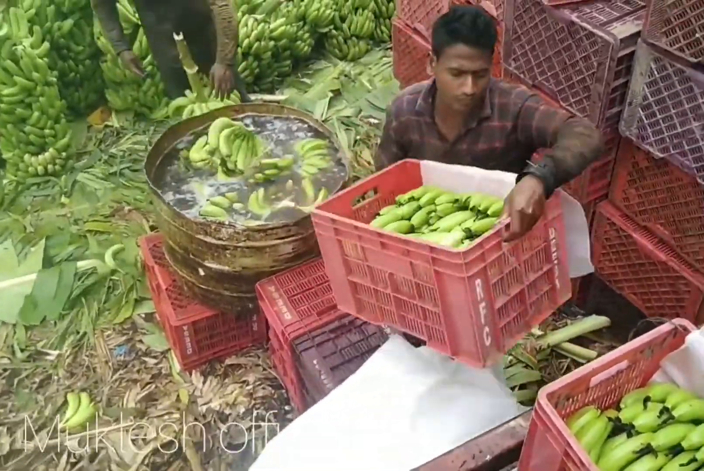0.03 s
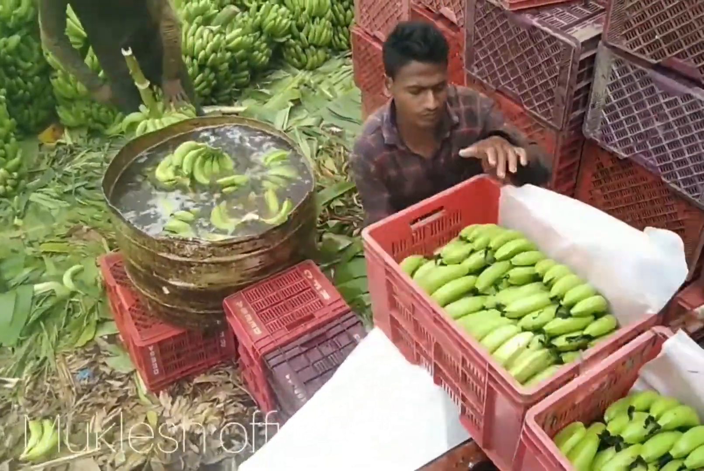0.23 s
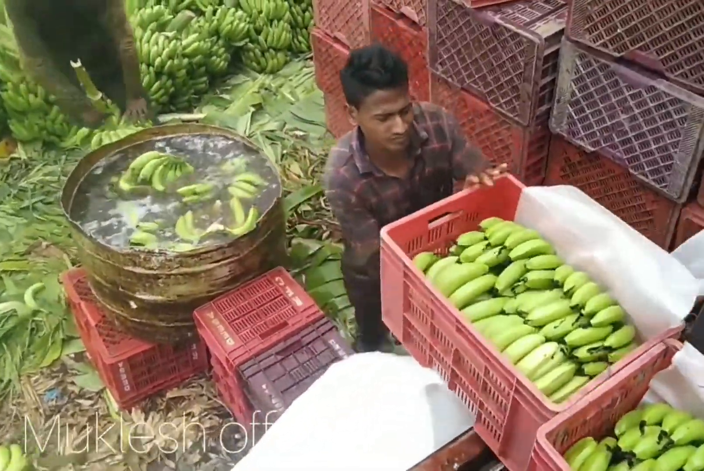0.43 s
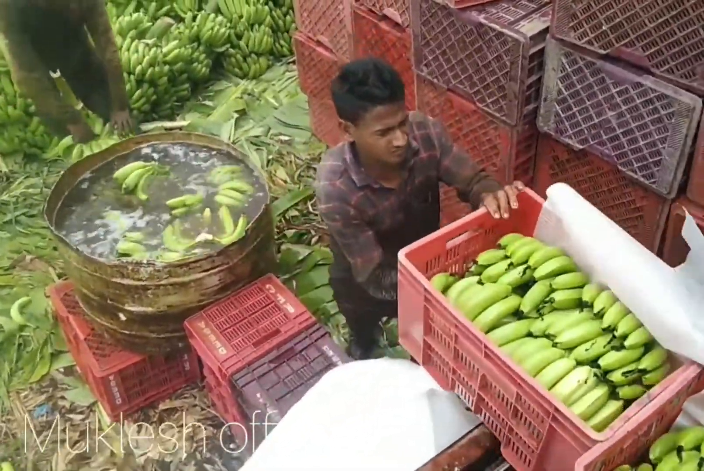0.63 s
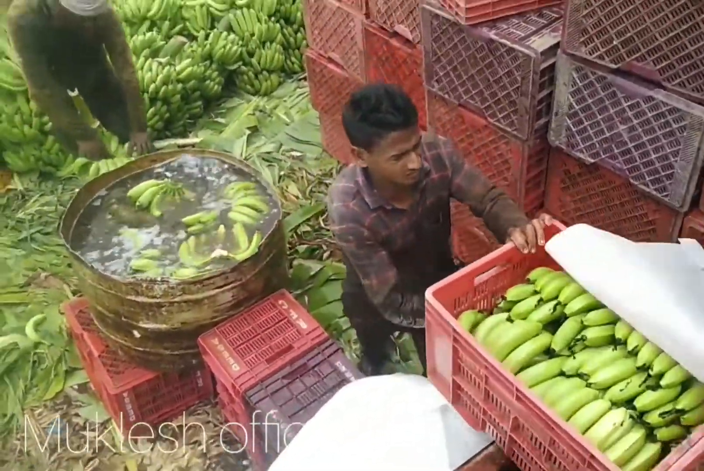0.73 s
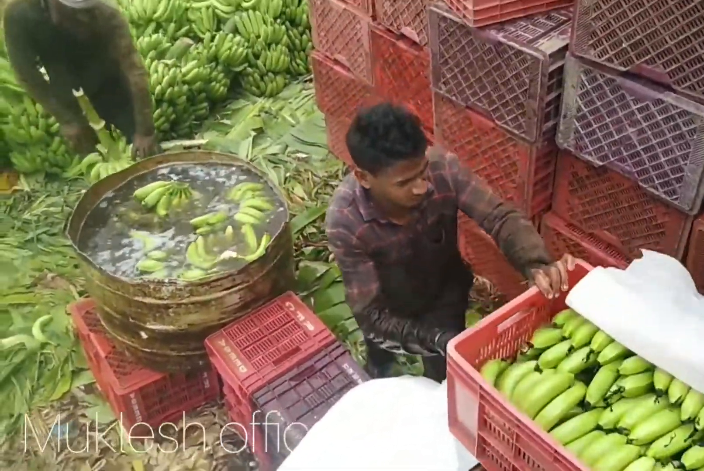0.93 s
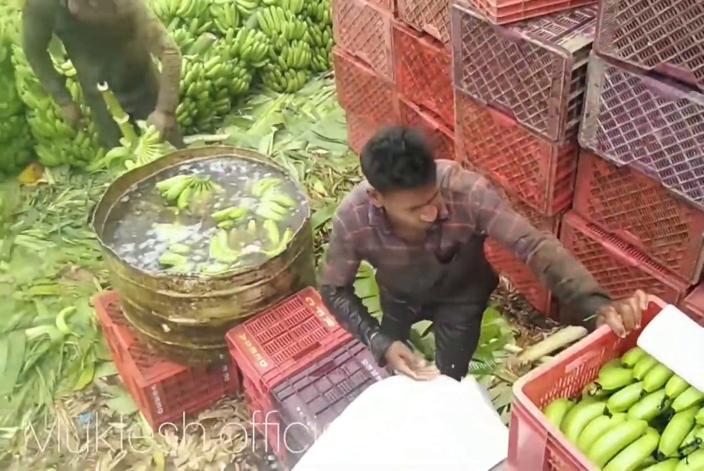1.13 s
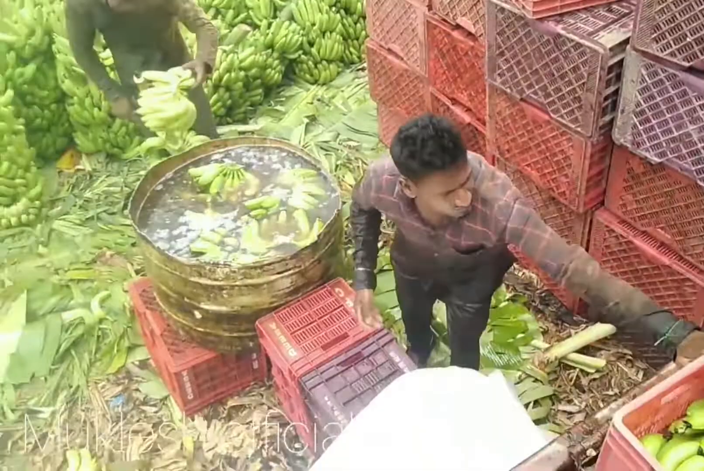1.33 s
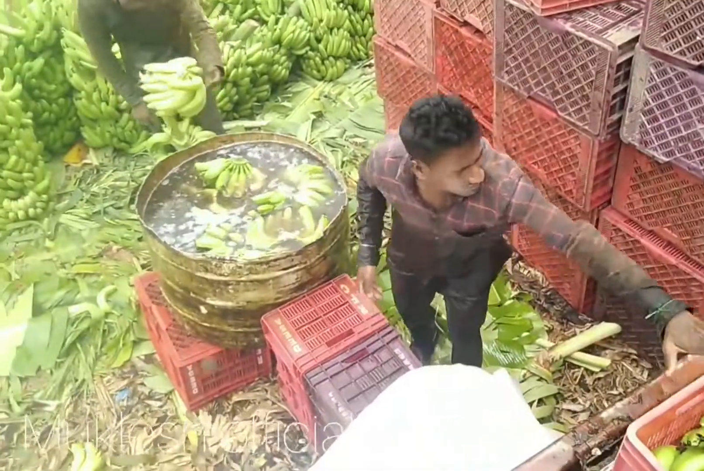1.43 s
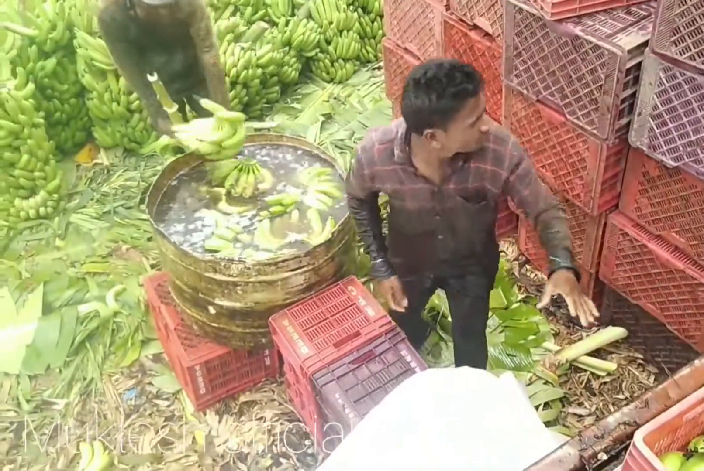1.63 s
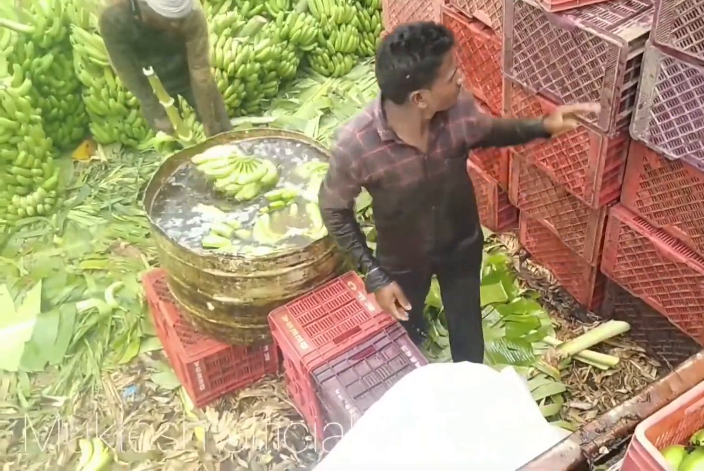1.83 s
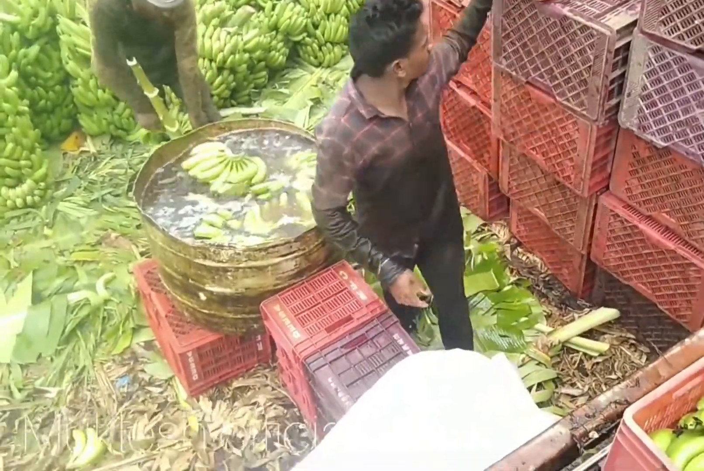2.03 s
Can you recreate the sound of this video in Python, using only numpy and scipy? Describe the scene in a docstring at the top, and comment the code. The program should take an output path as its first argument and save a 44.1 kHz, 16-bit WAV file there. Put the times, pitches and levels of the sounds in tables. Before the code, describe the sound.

Close outdoor sound of a heavy plastic crate set down edge by edge, clattering and thumping, then pushed along with a rough hissing scrape, a small snap, low wind, and faint plastic taps with sheet rustle.

```python
"""On a truck bed outdoors, a loaded plastic crate is set down, one edge and then the other, and shoved along.
Blows are noise clatter with ringing modes; the slide is random slips through resonances, with a hiss on top.
Filtered noise bursts thump as the base rides over bumps, and clouds of tiny resonant clicks make the rustles.
Light taps add decaying sines, a tick snaps as the crate comes to rest, and low noise swells as a light wind."""
import sys
import numpy as np
from scipy import signal
from scipy.fft import rfft, irfft
from scipy.io import wavfile
from scipy.ndimage import uniform_filter1d

SR = 44100
rng = np.random.default_rng(int(sys.argv[2]) if len(sys.argv) > 2 else 0)


def to_wav(sig):
    """Store sig (one row per channel, or 1-D mono) as 16-bit WAV at the path in sys.argv[1].

    Samples outside -1..1 are clipped; the rate is SR.
    """
    pcm = np.clip(np.atleast_2d(sig), -1, 1) * 32767
    pcm = np.round(pcm).astype(np.int16)
    wavfile.write(sys.argv[1], SR, pcm.T)  # frames by channels


N = 92036  # samples


def undb(db):
    """Decibels to gain."""
    return 10 ** (np.asarray(db) / 20)


def unit(x):
    """Scale to rms 1."""
    return x / np.sqrt(np.mean(x ** 2) + 1e-20)


def curve(table, axis=1):
    """Gain over time, drawn straight in dB between the rows of a table."""
    rows = np.array(table)
    return undb(np.interp(np.arange(N) / SR, rows[:, 0], rows[:, axis]))


def response(points):
    """Gain at each frequency, drawn on a log frequency axis through (Hz, dB) points."""
    hz, db = np.array(points, float).T
    bins_hz = np.arange(N + 1) * SR / (2 * N)
    return undb(np.interp(np.log(bins_hz + 1), np.log(hz), db))


def colour(x, points):
    """Causal minimum-phase filter that leaves the level of white noise unchanged."""
    cepstrum = irfft(np.log(unit(response(points))))
    # folding the cepstrum forward in time makes the filter causal
    cepstrum[1:N] *= 2
    cepstrum[N + 1:] = 0
    return irfft(rfft(x, 2 * N) * np.exp(rfft(cepstrum)))[:N]


def resonate(x, hz, width_hz):
    """One resonance that leaves the level of white noise unchanged."""
    peak = signal.iirpeak(hz, hz / width_hz, SR)
    return signal.lfilter(*peak, x) * np.sqrt(SR / (np.pi * width_hz))


def walk(rate_hz):
    """Smooth random wander of rms 1."""
    hold = max(int(SR / rate_hz), 1)
    steps = np.repeat(rng.standard_normal(N)[:N // hold + 1], hold)
    return unit(uniform_filter1d(steps, hold)[:N])


def grains(per_s, spread_db):
    """Dense clicks of random size and sign, rms 1."""
    size = np.minimum(rng.exponential(size=N), 4)  # caps the rare giants
    hits = rng.random(N) < per_s / SR
    return unit(hits * rng.choice([-1, 1], N) * undb(spread_db * size))


def burst(start, rise, t60):
    """Straight rise, then exponential decay."""
    age = np.arange(N) / SR - start
    return np.clip(age / rise, 0, 1) * np.exp(-np.log(1000) * np.maximum(age - rise, 0) / t60)


def strength(x, envelope, db):
    """Give a short sound the energy of an envelope that peaks at db."""
    return unit(x) * np.sqrt(np.mean(envelope ** 2)) * undb(db)


def ping(start, rise, t60, hz):
    """One panel or rib rings out as a decaying sine; rms 1 at its peak."""
    sine = np.sin(2 * np.pi * hz * (np.arange(N) / SR - start))
    return burst(start, rise, t60) * np.sqrt(2) * sine


PATCH_HZ, PATCH_S, PATCH_DB = 258.2, .05, 2  # size of a patch in pitch and time, rms depth


def shifting(x, size=512):
    """As the points of contact change, narrow resonances swell and fade at random."""
    spectrum = signal.stft(x, nperseg=size)[2]
    patches = rng.standard_normal(spectrum.shape)
    patches = uniform_filter1d(patches, int(PATCH_HZ * size / SR) + 1, axis=0)
    patches = uniform_filter1d(patches, int(PATCH_S * 2 * SR / size) + 1, axis=1)
    return unit(signal.istft(spectrum * undb(PATCH_DB * unit(patches)), nperseg=size)[1][:N])


# light taps on hollow plastic: start_s, level_db, ring_hz, ring_t60_s
TAPS = [(0, -43.5, 914, 0.064), (0.0187, -45.5, 1690, 0.052), (.0305, -40.5, 842, 0.081),
        (.034, -50.5, 1820, 0.11), (0.0872, -48, 980, 0.05), (1.724, -42, 1830, 0.044),
        (1.734, -43.5, 1070, .035), (1.7445, -42, 1855, 0.063), (1.7777, -41, 1680, .03),
        (1.795, -37.5, 1490, .05), (1.798, -44.5, 680, .06), (1.8227, -38.5, 1556, 0.03),
        (1.8405, -45, 1610, .04), (1.9039, -47.5, 1535, 0.056), (1.939, -51.5, 1806, .06),
        (1.977, -49, 4290, 0.039)]
# colour of grit under a contact, in the taps and in the slide: freq_hz, gain_db
GRIT_COLOUR = [(60, -20.5), (150, -7.5), (260, -9.5), (350, -5), (950, -1.5), (1300, -3), (1850, -1.5),
               (2300, -8), (2800, -7.5), (5000, -17), (15000, -33)]
TAP_RISE_S, TAP_GRIT_DB, TAP_GRIT_T60_S = 0.0017, -4.5, 0.064  # grit level is relative to the tap


def taps():
    """Light contacts: each crunches briefly and rings one panel."""
    grit = unit(colour(rng.standard_normal(N), GRIT_COLOUR))
    out = 0
    for start, db, hz, t60 in TAPS:
        crunch = undb(TAP_GRIT_DB) * burst(start, TAP_RISE_S, TAP_GRIT_T60_S) * grit
        out = out + undb(db) * (ping(start, TAP_RISE_S, t60, hz) + crunch)
    return out


CRINKLES_PER_S, CRINKLE_SPREAD_DB = 10000, 3  # rate over all pitches together
CREASE_RANGE_HZ, CREASE_Q = (593, 15100), 4.5


def crackle(count=22):
    """Each tiny crease snaps at its own pitch; small, high ones are the most common. Rms 1."""
    pitches = np.geomspace(*CREASE_RANGE_HZ, count)
    shares = pitches / pitches.sum()
    out = 0
    for hz, share in zip(pitches, shares):
        snaps = grains(CRINKLES_PER_S * share, CRINKLE_SPREAD_DB)
        out = out + np.sqrt(share) * resonate(snaps, hz, hz / CREASE_Q)
    return unit(out)


# the lining and leaves rustle: start_s, level_db, rise_s, t60_s, crispness_db (treble gain)
RUSTLES = [(0, -50, 0.0079, 0.82, -0.5), (0.108, -39.5, 0.0066, 0.052, 0.5),
           (0.177, -30.5, 0.0067, 0.16, 8), (1.704, -39, 0.0051, 0.43, -1),
           (1.786, -43.5, 0.014, 0.24, -11), (1.834, -46.5, 0.0067, 0.32, -7), (1.87, -55, 0.12, 0.31, -6),
           (2.072, -48.5, 0.00099, 0.1, 2)]
# colour of the crinkling sheet: freq_hz, gain_db
SHEET_COLOUR = [(200, 14), (700, 3.5), (4300, 4.5), (5100, 1.5), (7800, 6), (10000, 0), (14500, 4)]
CRISP_HZ = 8400  # crispness acts above here


def rustles():
    """Flurries of fine crinkles, some crisper than others."""
    crinkles = shifting(colour(crackle(), SHEET_COLOUR))
    dull = signal.sosfiltfilt(signal.butter(4, CRISP_HZ, fs=SR, output="sos"), crinkles)
    crisp = crinkles - dull
    out = 0
    for start, db, rise, t60, crisp_db in RUSTLES:
        envelope = burst(start, rise, t60)
        out = out + strength(envelope * (dull + undb(crisp_db) * crisp), envelope, db)
    return out


# wind on the microphone: time_s, level_db
WIND = [(.03, -38.5), (.08, -55), (.23, -44.5), (.48, -41.5), (.56, -46), (.8, -44.5), (.92, -55),
        (1.22, -56), (1.45, -35.5), (1.59, -39), (1.68, -47.5), (1.75, -36.5), (1.81, -38), (1.9, -59),
        (2.09, -59)]
# colour of the buffeting: freq_hz, gain_db
BUFFET_COLOUR = [(28, -3), (58, -3), (85, -5), (130, -15.5), (220, -22.5), (700, -57)]
# colour of the open yard: freq_hz, gain_db
YARD_COLOUR = [(300, 4), (1700, 1.5), (5000, -1.5), (7500, 1.5), (10000, -9), (14500, 0.5)]
YARD_DB = -57.5


def air():
    """Low noise gusts on the microphone over the faint hiss of the yard."""
    gusts = unit(colour(rng.standard_normal(N), BUFFET_COLOUR)) * curve(WIND)
    yard = unit(colour(rng.standard_normal(N), YARD_COLOUR))
    return gusts + undb(YARD_DB) * yard


# modes of the loaded crate: pitch_hz, level_db, t60_s
CRATE_MODES = [(252.9, -5.5, 0.32), (354, 0.5, 0.093), (608, -4, 0.17), (857, -3, 0.19), (978, 0.5, 0.08),
               (1480, -13, 0.054), (1790, -1.5, 0.03), (2260, 1, 0.054), (2490, -3.5, 0.055)]


def walls(push):
    """The crate's modes ring to a push, with alternating sign."""
    out = 0
    for k, (hz, db, t60) in enumerate(CRATE_MODES):
        width_hz = np.log(1000) / (np.pi * t60)
        out = out + (-1) ** k * undb(db) * resonate(push, hz, width_hz)
    return out


TREBLE_HZ = 1940


def soften(x, treble_db):
    """Tilt the treble against the rest: a softer contact has less of it."""
    return colour(x, [(TREBLE_HZ * .8, 0), (TREBLE_HZ * 1.05, treble_db)])


# the crate lands: start_s, level_db, rise_s, wall_ring_db (relative), treble_db, rib_hz
KNOCKS = [(0.1707, -18, 0.00246, -5.5, -4.5, 1470), (0.2426, -17, .004, -7.5, 1, 2253),
          (0.256, -24.5, 0.0032, -16, -4, 988), (0.452, -26, 0.0055, -21, -6, 1567),
          (0.57, -30.5, 0.0036, -12, -3, 1807)]
# colour of a blow: freq_hz, gain_db
BLOW_COLOUR = [(60, -53), (200, -38), (450, 16.5), (1550, 10.5), (1850, 5), (2300, 7), (3100, 0.5),
               (5500, -6), (7800, -1.5), (10000, -12.5)]
RIB_DB, RIB_T60_S = -5, 0.044  # rib and tail levels are relative to the blow
KNOCK_T60_S, KNOCK_TAIL_DB, KNOCK_TAIL_T60_S = 0.073, -25, 0.15


def knocks():
    """Each blow is a short clatter with a tail, and sets the struck rib and the walls ringing."""
    out = 0
    for start, db, rise, ring_db, treble_db, rib_hz in KNOCKS:
        contact = burst(start, rise, KNOCK_T60_S)
        tail = undb(KNOCK_TAIL_DB) * burst(start, rise, KNOCK_TAIL_T60_S)
        envelope = np.maximum(contact, tail)
        crack = soften(colour(envelope * rng.choice([-1, 1], N), BLOW_COLOUR), treble_db)
        push = signal.unit_impulse(N, int((start + rise / 2) * SR))
        ring = soften(walls(push), treble_db)
        out = out + strength(crack, envelope, db) + strength(ring, contact, db + ring_db)
        out = out + undb(db + RIB_DB) * ping(start, rise, RIB_T60_S, rib_hz)
    return out


# sliding: time_s, grinding_db, hiss_db
SLIDE = [(.17, -84, -77), (.182, -27.5, -30), (.215, -28.5, -30.5), (.262, -32.5, -37.5),
         (.3, -37.5, -41.5), (.41, -38.5, -41), (.52, -36.5, -39.5), (.62, -33.5, -35.5), (.98, -35, -36),
         (1.04, -31, -33.5), (1.14, -32, -34), (1.23, -32.5, -32.5), (1.32, -28, -31.5),
         (1.405, -31.5, -37.5), (1.48, -39, -46.5), (1.53, -60, -57.5), (1.58, -85, -83)]
# colour of the rubbing hiss: freq_hz, gain_db
HISS_COLOUR = [(500, -10), (1800, -27.5), (2600, 6), (3800, 3.5), (5300, -2), (6500, 1), (7600, 6),
               (8300, 2), (9300, -6.5), (11500, -9), (13000, -5.5), (14500, -0.5), (16000, -9.5)]
SLIPS_PER_S, SLIP_SPREAD_DB = 9000, 2.5
SLIDE_RING_DB = -9  # walls relative to the grit
JUDDER_HZ, JUDDER_DB = 59.8, 0.5  # rate and rms depth


def slide():
    """Tiny slips over grit shake the crate, while the rubbing surfaces hiss; both judder together."""
    slips = grains(SLIPS_PER_S, SLIP_SPREAD_DB)
    grit = shifting(colour(slips, GRIT_COLOUR))
    ring = unit(walls(grains(SLIPS_PER_S, SLIP_SPREAD_DB)))
    grinding = grit + undb(SLIDE_RING_DB) * ring
    hiss = shifting(colour(slips + rng.standard_normal(N), HISS_COLOUR))
    judder = undb(JUDDER_DB * walk(JUDDER_HZ))
    return judder * (grinding * curve(SLIDE, axis=1) + hiss * curve(SLIDE, axis=2))


# the load thumps as the base rides over bumps: start_s, level_db (before colouring), rise_s, t60_s
BUMPS = [(0.191, -27.5, 0.0049, 0.51), (0.248, -23, 0.0043, 0.067), (0.274, -26.5, 0.0029, 0.37),
         (0.349, -37.5, 0.039, 0.65), (0.433, -31.5, 0.0038, 0.44), (1.02, -29.5, 0.049, 0.058),
         (1.254, -31, 0.018, 0.62), (1.448, -34.5, 0.03, 0.11)]
# colour of a thump: freq_hz, gain_db
THUMP_COLOUR = [(40, -29), (90, -3.5), (140, 6.5), (270, 6.5), (420, 5), (650, -0.5), (1000, -1.5),
                (5000, -41.5)]


def bumps():
    """Dull thumps of the load: noise bursts through a low, heavy colour."""
    out = 0
    for start, db, rise, t60 in BUMPS:
        envelope = burst(start, rise, t60)
        out = out + strength(envelope * rng.standard_normal(N), envelope, db)
    return colour(out, THUMP_COLOUR)


# a sharp plastic tick: start_s, level_db, t60_s
TICK = (1.5468, -34.5, 0.039)
# its resonances: pitch_hz, width_hz, level_db
TICK_MODES = [(2340, 130, 1), (2797, 160, -1.5), (3380, 240, 1.5), (4550, 570, 0.5), (7100, 650, 4.5)]


def tick():
    """A small snap of plastic as the crate comes to rest: a noise burst rings a few high modes."""
    start, db, t60 = TICK
    envelope = burst(start, TAP_RISE_S, t60)
    push = envelope * rng.choice([-1, 1], N)
    ring = 0
    for k, (hz, width_hz, mode_db) in enumerate(TICK_MODES):
        ring = ring + (-1) ** k * undb(mode_db) * unit(resonate(push, hz, width_hz))
    return strength(ring, envelope, db)


# colour of the scattered treble: freq_hz, gain_db
SCATTER_COLOUR = [(3400, -63), (5200, 5.5), (7000, -13), (11000, 5), (15000, -1.5)]
SIDE_DB, SIDE_FROM_HZ, SIDE_FOLLOW_S = -9, 9100, 0.006  # level before colouring, crossover, smoothing


def diffuse(mid):
    """Scattered treble that differs between the ears and follows the level of the direct treble."""
    high_pass = signal.butter(4, SIDE_FROM_HZ, "high", fs=SR, output="sos")
    treble = signal.sosfilt(high_pass, mid)
    power = uniform_filter1d(treble ** 2, int(SIDE_FOLLOW_S * SR) + 1)
    follow = np.sqrt(np.abs(power))  # abs guards against rounding below zero
    return undb(SIDE_DB) * colour(follow * rng.standard_normal(N), SCATTER_COLOUR)


def scene():
    """Everything sits in the centre; only the scattered treble goes to the sides."""
    mid = knocks() + slide() + bumps() + taps() + tick() + rustles() + air()
    side = diffuse(mid)
    return np.array([mid + side, mid - side])


TOP_HZ = 15550


def record(dry):
    """A steep low-pass cuts the top of the treble."""
    low_pass = signal.ellip(10, .2, 80, TOP_HZ, fs=SR, output="sos")
    return signal.sosfilt(low_pass, dry)


dry = scene()
out = record(dry)
to_wav(out)
```